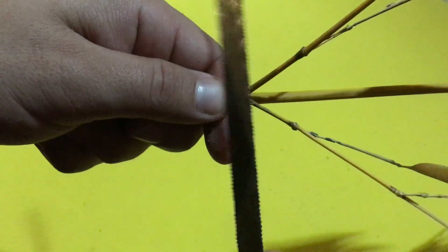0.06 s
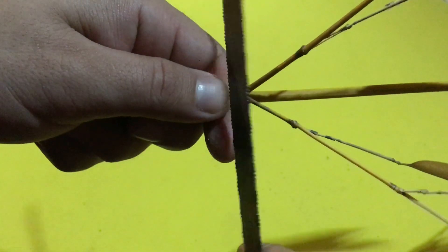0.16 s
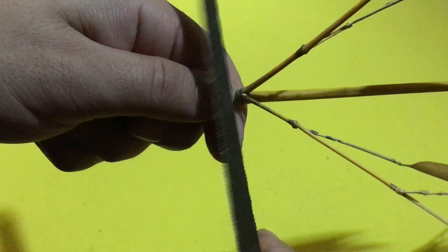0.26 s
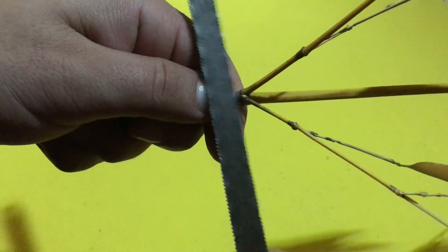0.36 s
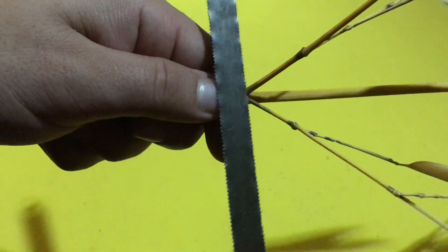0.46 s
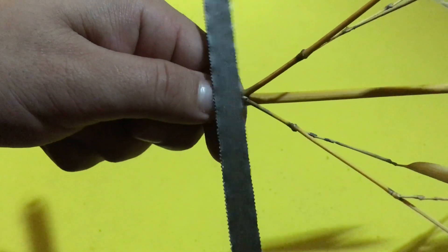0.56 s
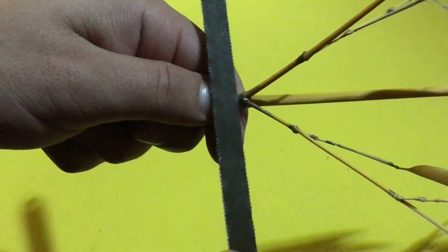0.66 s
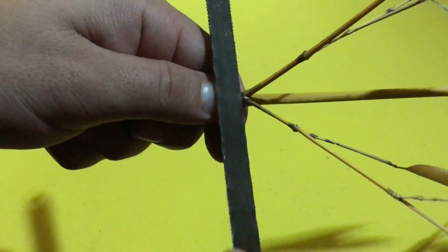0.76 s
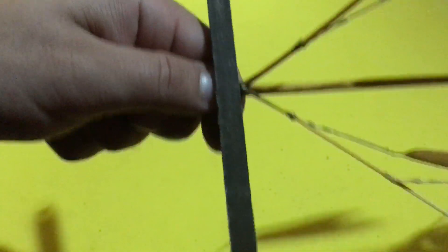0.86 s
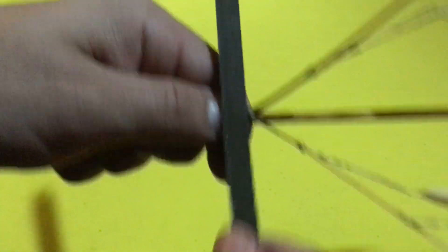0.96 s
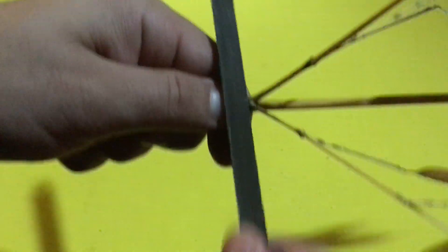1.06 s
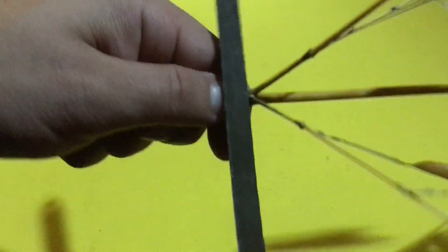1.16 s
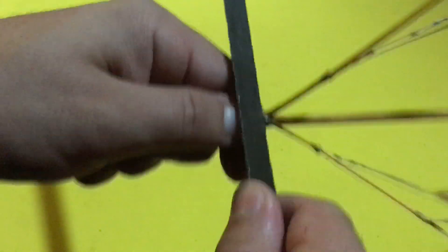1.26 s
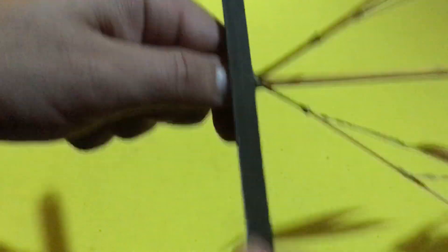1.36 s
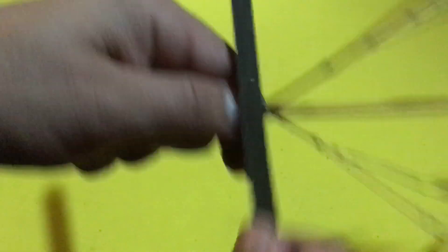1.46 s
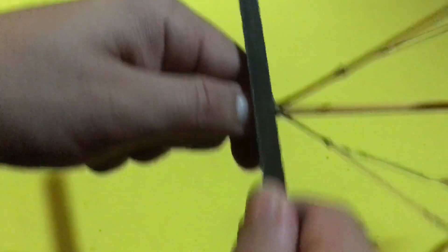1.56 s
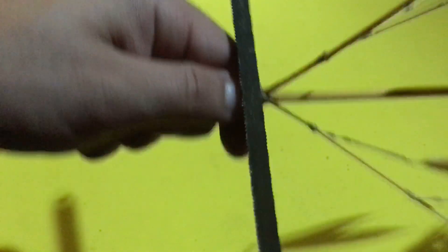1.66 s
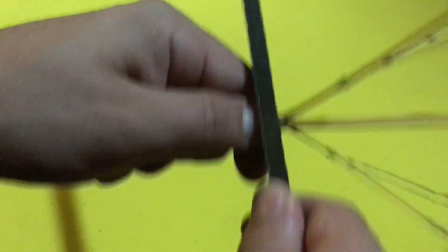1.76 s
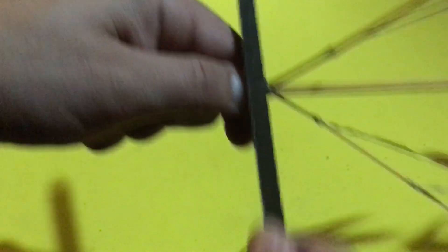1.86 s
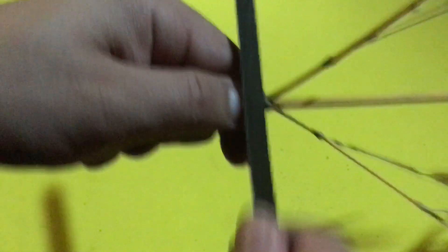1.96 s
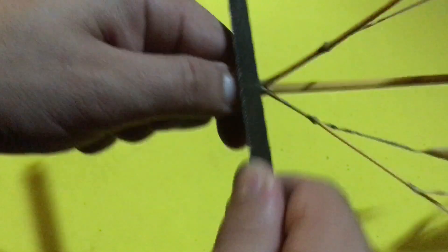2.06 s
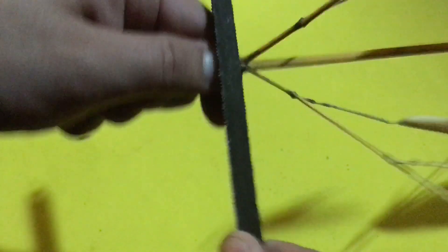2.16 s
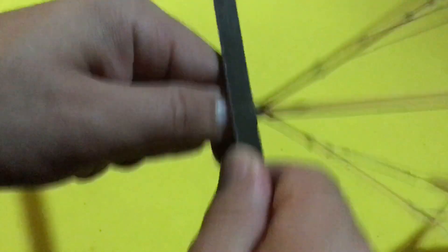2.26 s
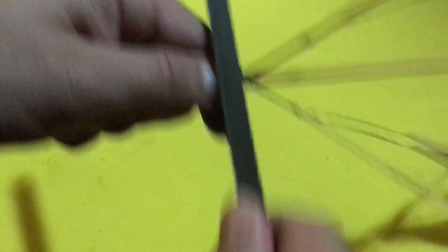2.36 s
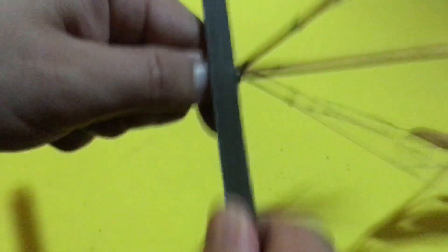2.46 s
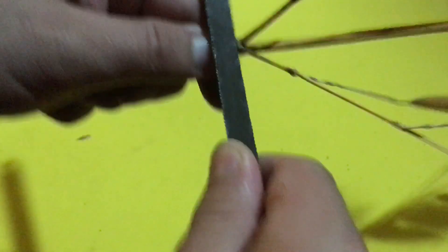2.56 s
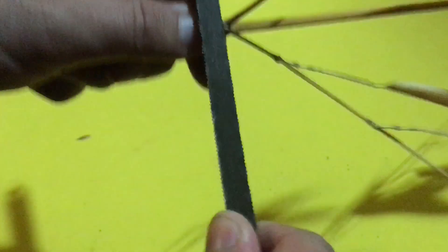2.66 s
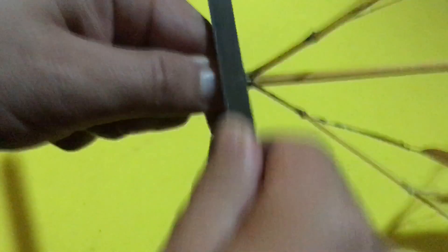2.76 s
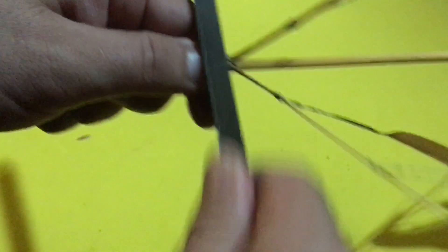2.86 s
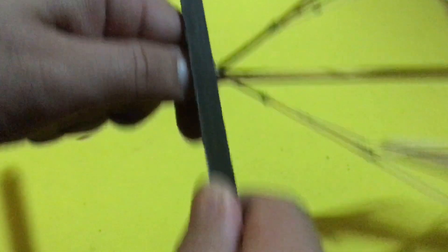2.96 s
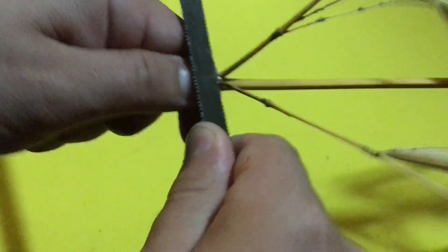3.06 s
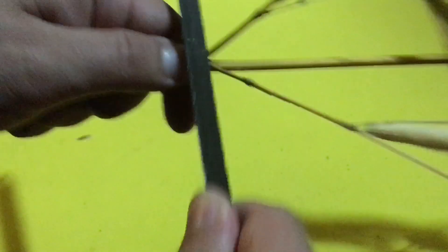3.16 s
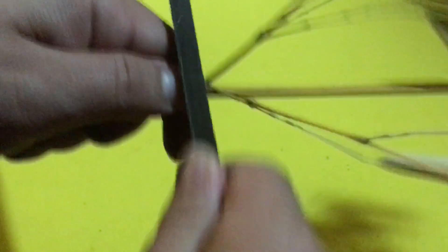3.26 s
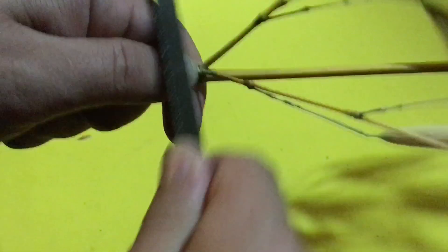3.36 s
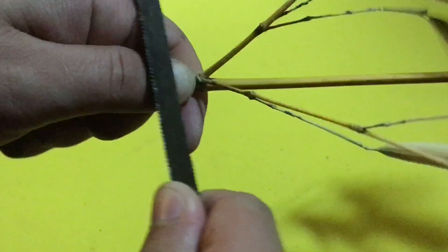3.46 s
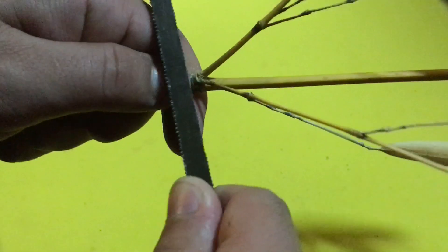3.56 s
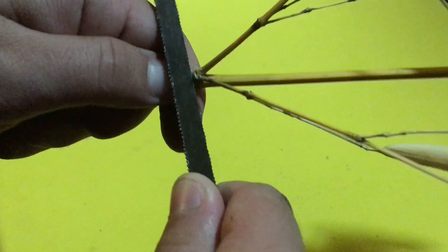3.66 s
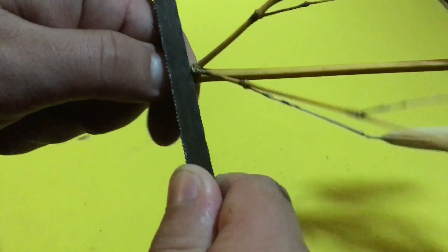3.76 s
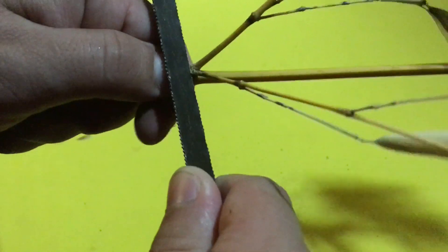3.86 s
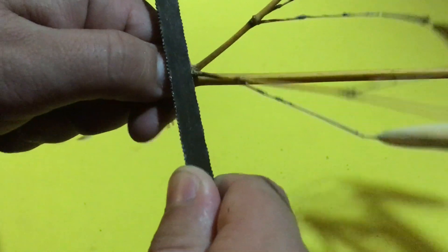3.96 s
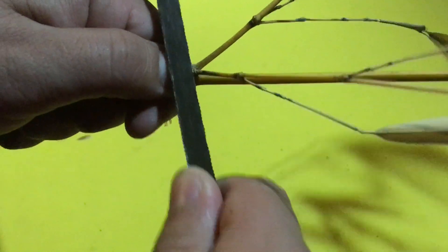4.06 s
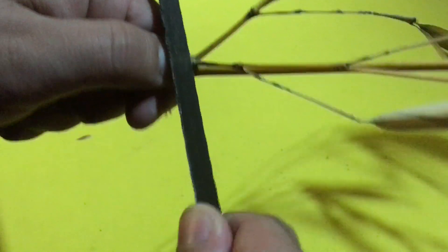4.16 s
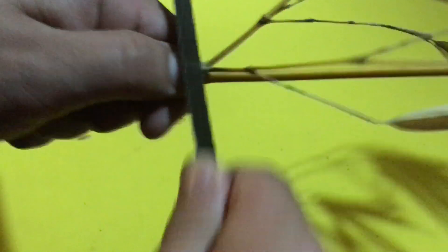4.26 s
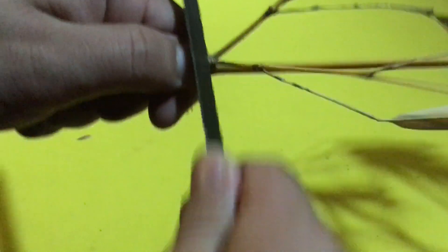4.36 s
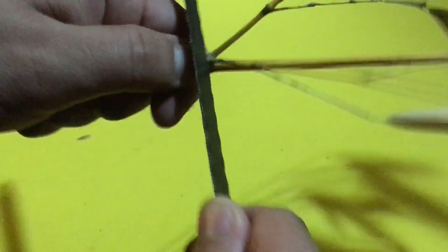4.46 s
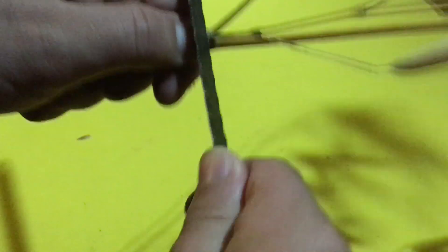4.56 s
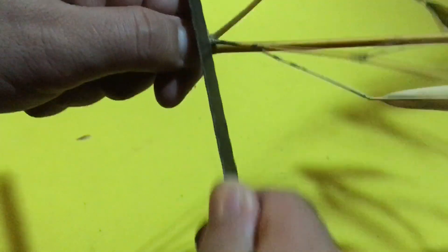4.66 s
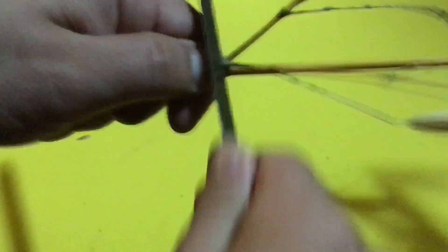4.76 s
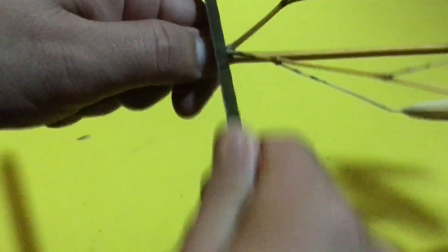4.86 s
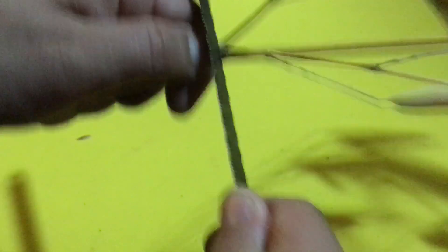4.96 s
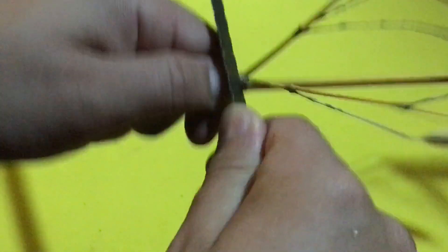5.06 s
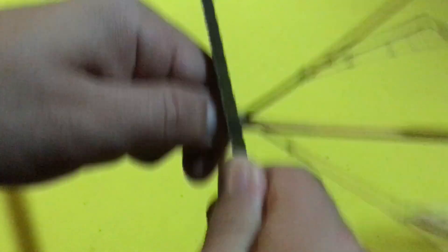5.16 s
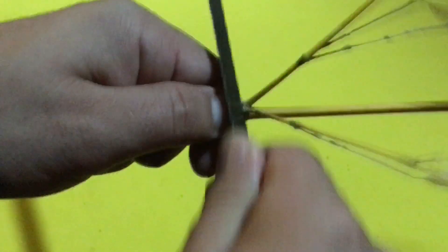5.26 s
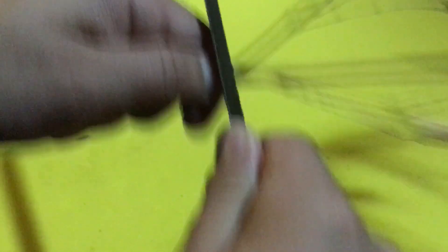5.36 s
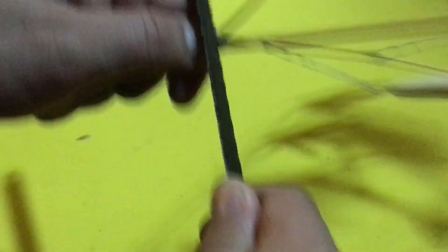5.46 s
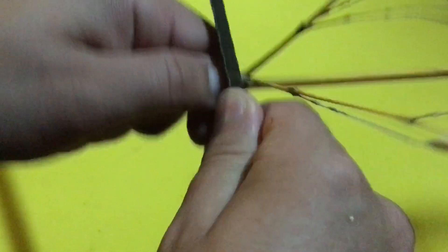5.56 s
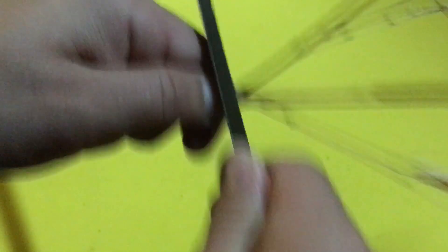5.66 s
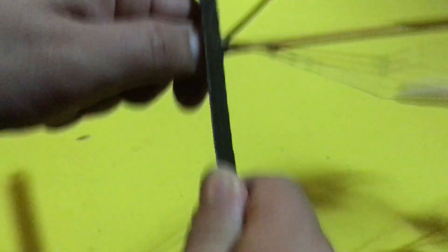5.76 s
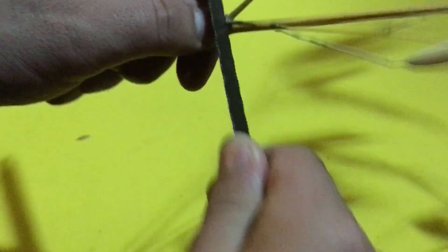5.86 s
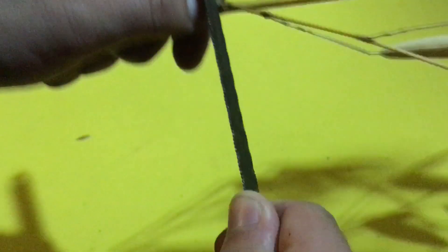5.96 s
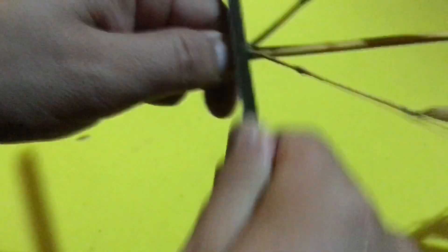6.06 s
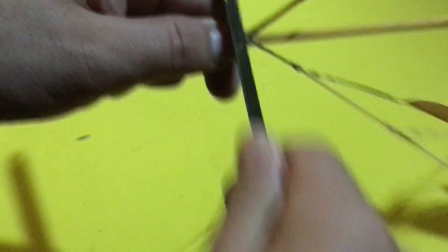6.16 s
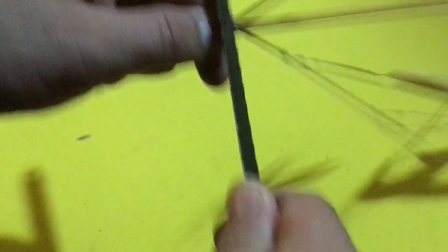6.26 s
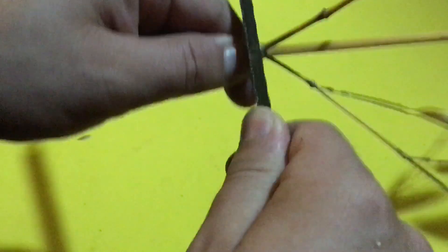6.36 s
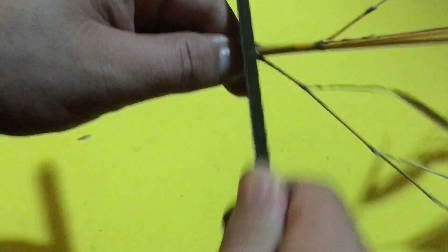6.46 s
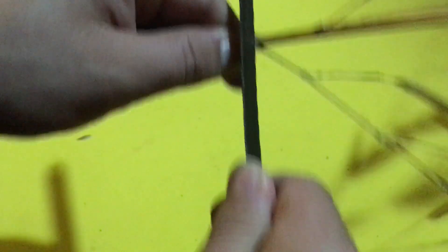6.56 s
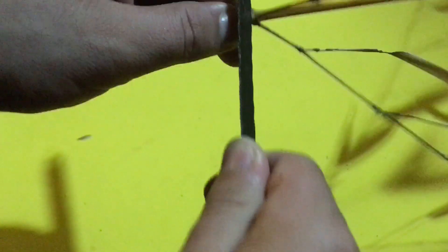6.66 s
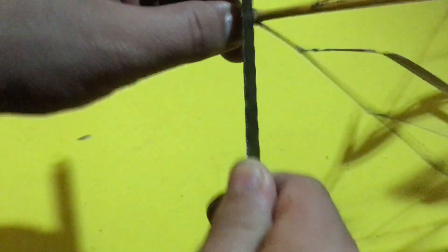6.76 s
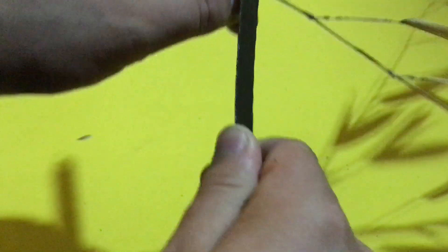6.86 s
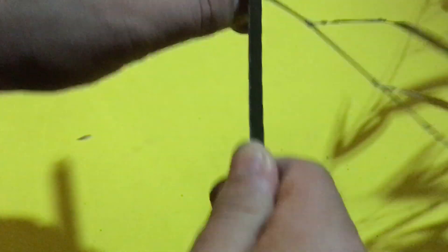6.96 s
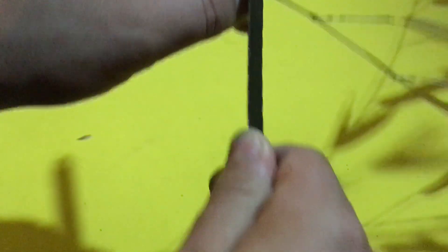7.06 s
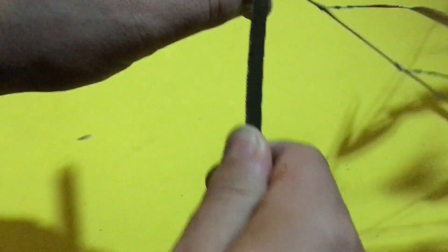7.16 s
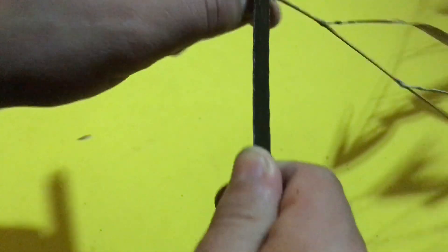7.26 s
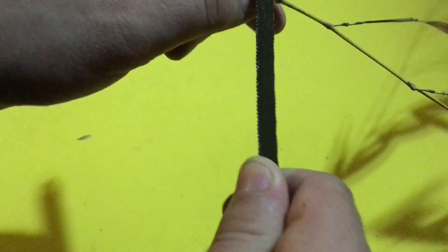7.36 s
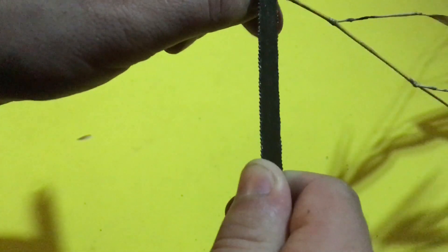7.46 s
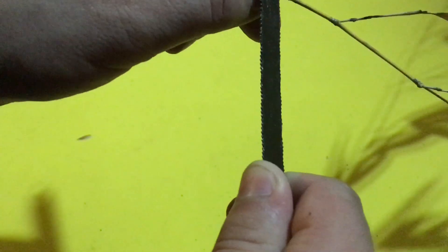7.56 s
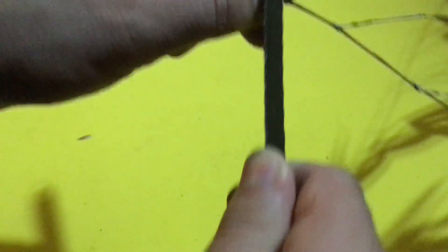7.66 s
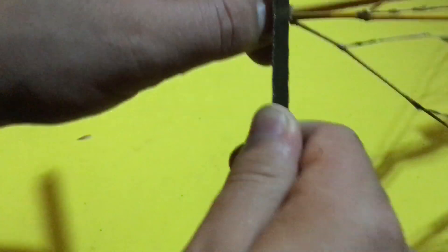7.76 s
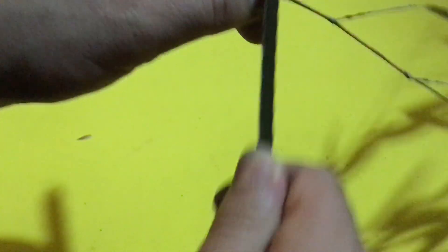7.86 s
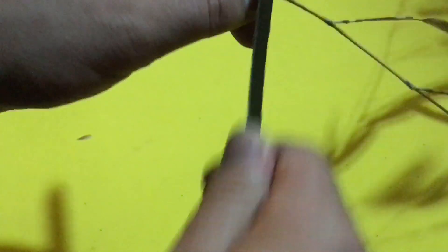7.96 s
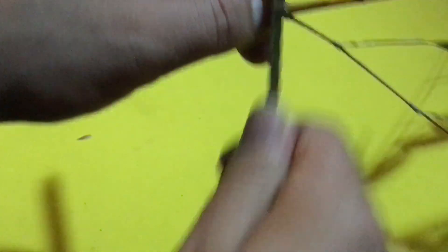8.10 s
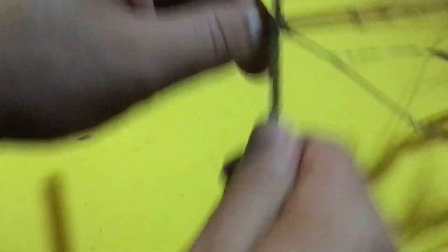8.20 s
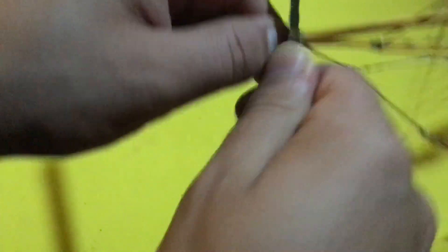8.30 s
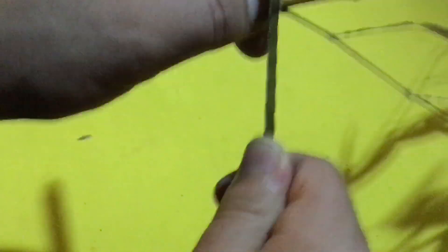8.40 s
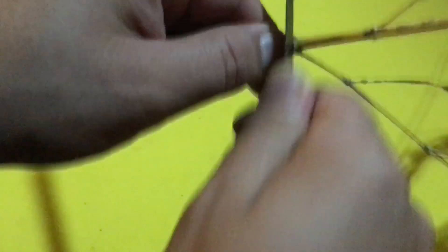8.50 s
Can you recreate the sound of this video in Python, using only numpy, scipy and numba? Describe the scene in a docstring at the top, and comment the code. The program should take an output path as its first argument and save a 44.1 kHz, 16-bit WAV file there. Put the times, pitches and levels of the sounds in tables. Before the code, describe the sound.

A small saw blade rasps in quick short strokes across a thin dry twig while dry leaves rustle and tick crisply, close up in a quiet room.

```python
"""At a table in a quiet room, a small hacksaw blade is drawn to and fro across a thin dry bamboo twig.
Each tooth tears fibres: short clicks and noise that ring the blade and the hollow wood.
The beat of the teeth bends the twig into a hum, and the hand adds low jolts.
The shaken dry leaves rustle and tick: bursts of noise passed through mostly treble resonances.
A phone close by picks it all up, with short echoes, soft room noise and faint low tones."""
import sys
import numpy as np
from scipy import signal
from scipy.fft import rfft, irfft
from scipy.io import wavfile
from scipy.ndimage import uniform_filter1d
from numba import njit

SR = 44100
rng = np.random.default_rng(int(sys.argv[2]) if len(sys.argv) > 2 else 0)


def master_out(mix):
    """Clip the mix to full scale and print it as 16-bit PCM to the path in sys.argv[1]."""
    frames = np.transpose(np.atleast_2d(mix))
    ceiling = np.clip(frames, -1, 1)
    pcm = np.round(ceiling * 32767).astype(np.int16)
    wavfile.write(sys.argv[1], SR, pcm)


N = 376215

# Saw strokes; the levels set the layers before their final mix, and the tooth rate is the fastest one:
# start_s, rise_s, length_s, rasp_db, favoured_blade_hz, woody_db, teeth_per_s, leaf_shake_db
SAW_STROKES = [(0.841, 0.035, .06, -61.5, 2255, -69, 220, -61),
               (0.942, 0.0037, .098, -56.5, 1880, -58, 267, -42),
               (1.107, 0.028, .073, -55.5, 2780, -59, 260, -62),
               (1.208, 0.0033, .09, -50.5, 1800, -54.5, 496, -41),
               (1.336, 0.058, 0.087, -52, 2510, -57, 235, -59),
               (1.461, 0.047, 0.092, -48, 2020, -54.5, 440, -44),
               (1.596, 0.037, 0.092, -56, 2905, -58, 195, -70),
               (1.717, 0.01, .086, -52.5, 1787, -56.5, 460, -47),
               (1.85, 0.078, 0.078, -52, 2600, -58.5, 217, -45),
               (1.961, 0.051, .11, -50.5, 2220, -56, 370, -38),
               (2.121, 0.026, .066, -49.5, 2580, -57.5, 440, -49),
               (2.216, 0.03, .11, -48, 2244, -56.5, 580, -38.5),
               (2.36, 0.034, .09, -47, 2680, -57, 550, -42),
               (2.479, 0.028, .089, -49.5, 2226, -54, 410, -32.5),
               (2.623, 0.04, .077, -50, 2270, -54, 347, -49),
               (2.728, 0.023, .098, -47, 2180, -52.5, 345, -36),
               (2.865, 0.029, .097, -57, 2860, -60.5, 237, -45.5),
               (2.985, 0.03, .1, -50.5, 1780, -56.5, 226, -40),
               (3.156, 0.022, .073, -45.5, 3000, -52.5, 262, -38.5),
               (3.252, 0.029, 0.088, -47.5, 1790, -52, 253, -34),
               (4.031, 0.0078, .055, -64.5, 2800, -81, 254, -73),
               (4.12, 0.011, .09, -60.5, 2770, -55, 330, -47),
               (4.253, 0.0094, .097, -52.5, 2520, -52.5, 324, -44.5),
               (4.378, 0.0029, .124, -63, 2893, -60, 280, -48.5),
               (4.528, 0.0051, .035, -65, 2410, -60.5, 390, -43),
               (4.573, 0.011, .06, -61, 2440, -62, 390, -42.5),
               (4.665, 0.0052, .077, -65.5, 2710, -67, 370, -46.5),
               (4.757, 0.02, .107, -52.5, 2630, -57, 320, -38),
               (4.908, .014, .077, -57, 2927, -59.5, 350, -42.5),
               (5.012, 0.018, .088, -48, 2488, -53.5, 330, -38.5),
               (5.305, 0.0028, .04, -60.5, 2560, -61, 216, -38.5),
               (5.387, 0.027, .081, -50, 3930, -56.5, 230, -39),
               (5.504, 0.043, .098, -45.5, 3960, -57, 273, -37.5),
               (5.612, 0.0029, .025, -62, 4440, -56.5, 620, -53),
               (5.688, 0.013, 0.074, -52.5, 1806, -57, 250, -37.5),
               (5.789, .0029, 0.067, -63, 4051, -70, 262, -41),
               (5.926, 0.023, .086, -54, 4400, -57.5, 330, -40),
               (6.021, 0.01, 0.11, -52, 1900, -57.5, 405, -37.5),
               (6.198, 0.027, .076, -45, 2420, -52, 420, -36.5),
               (6.296, 0.013, .112, -50.5, 2170, -52.5, 347, -37),
               (6.473, 0.0029, .071, -49, 1820, -51, 340, -38),
               (6.73, 0.029, .075, -56, 4700, -59.5, 360, -42),
               (7.041, 0.008, 0.055, -60, 3900, -66.5, 250, -45),
               (7.689, 0.03, .11, -64.5, 1822, -61.5, 395, -48.5),
               (7.831, 0.046, .11, -60, 2562, -60, 330, -48),
               (7.985, 0.026, .084, -51.5, 1810, -57, 270, -42),
               (8.119, 0.018, .075, -56.5, 3500, -57.5, 324, -44.5),
               (8.223, 0.014, .084, -54.5, 1800, -52.5, 340, -42.5),
               (8.338, 0.042, 0.09, -54, 2110, -54, 450, -39),
               (8.47, .05, .089, -49.5, 1780, -51.5, 430, -40)]
# Ways the blade can ring, before one is favoured: pitch_hz, width_hz, level_db
BLADE_MODES = [(1820, 78, 8.5), (2510, 510, -6.5), (2760, 93, 4), (3020, 27, -18), (3470, 110, 5.5),
               (3990, 110, 10.5), (4600, 630, 2)]
# Ways the twig bends to the beat of the teeth: pitch_hz, width_hz, level_db
TWIG_BENDING = [(243, 36, -1.5), (384.5, 45, -3.5), (320, 286, -7.5)]
# Ringing of the twig's hollow wall: pitch_hz, width_hz, level_db
HOLLOW_WOOD = [(568, 140, 3), (765, 170, 0.5), (933, 117, -3), (1230, 360, 0)]
# How freely the held twig bends: time_s, hum_above_woody_db
TWIG_FREEDOM = [(0.9, -2.5), (1.8, -8), (2.4, -2.5), (2.9, -12), (3.05, 0.5), (4.3, 3), (4.45, 5),
                (4.6, -1.5), (4.8, 4), (5.0, -3.5), (6.0, 2.5), (6.25, -10.5), (7.1, -7.5), (8.4, -5.5)]
# Leaves still swaying between strokes, before the final mix: time_s, rustle_db
LEAF_SWAY = [(0.4, -77), (0.6, -65), (0.75, -72.5), (0.92, -54.5), (1.05, -47), (1.17, -47), (1.7, -45.5),
             (2.53, -46.5), (3.21, -44), (3.41, -47), (3.68, -54), (4.18, -55), (4.93, -59), (5.13, -45.5),
             (5.3, -50), (5.49, -40.5), (5.74, -43.5), (6.17, -48.5), (6.4, -43), (6.56, -52), (7.24, -48),
             (7.52, -54), (7.62, -60.5), (7.87, -56), (8.17, -45), (8.53, -59)]
# Bright leaf colour as the microphone port's resonance shapes it: pitch_hz, width_hz, level_db
CRISP_LEAF = [(10500, 8600, -18.5), (12600, 2600, -4), (14330, 2600, -4.5)]
# Duller part of the leaf cracks: pitch_hz, width_hz, level_db
PAPERY_LEAF = [(8940, 1260, 5), (5620, 6100, -0.5), (2170, 69000, -4.5)]
# Leaves whipped together as the hand turns round: centre_s, level_db, pitch_hz
LEAF_FLURRIES = [(1.065, -42.5, 12700), (1.349, -38, 12400), (1.586, -39.5, 12160), (1.835, -41.5, 12340),
                 (2.081, -38, 12300), (2.375, -35.5, 12100), (2.59, -41, 13200), (2.85, -42, 13900),
                 (5.811, -36, 13900), (5.92, -39, 13400), (6.064, -35, 13600), (6.39, -42, 13450),
                 (6.515, -35.5, 12900)]
# Single leaf ticks, strength before filtering: time_s, strength_db, dull_part_relative_db
LEAF_TICKS = [(0.8777, -37, -4), (0.9516, -24, -19), (1.324, -17, -38), (1.491, -16, -28),
              (1.8225, -26, -21), (1.893, -17.5, -20), (2.06, -16, -33), (2.1283, -21, -12),
              (2.323, -22, -8), (2.355, -20, -19), (2.397, -29, -29), (2.555, -15, -32), (2.638, -21, -31),
              (2.6608, -17.5, -13), (3.155, -24, -16), (3.1915, -13.5, -14), (3.4459, -32, -15),
              (3.552, -43, -20), (3.689, -26.5, -10.5), (3.696, -27, -11), (3.9194, -34, -26),
              (4.3822, -28, -14), (4.533, -33, -5), (4.6694, -22, -23), (4.9258, -15, -32),
              (4.928, -24, -30), (5.0524, -20, -27), (5.171, -24.5, -28), (5.1942, -27, -15),
              (5.3137, -23.5, -14), (5.3393, -29, -23), (5.365, -19, -18), (5.421, -17, -13),
              (5.5491, -18, -29), (5.6193, -18, -17), (5.672, -16.5, -19.5), (5.737, -26, -7),
              (6.142, -32, -3), (6.3852, -18.5, -6), (6.467, -24, -16), (6.499, -14, -17),
              (6.732, -24, -13), (6.752, -20.5, -20), (6.8215, -27.5, -17), (6.859, -27.5, -14),
              (6.949, -34.5, -7), (6.998, -29.5, -20), (7.0437, -24, -17), (7.1412, -28, -13),
              (7.146, -24, -27), (7.174, -23.5, -30), (7.179, -24, -32), (7.33, -28, -13),
              (7.3677, -32, -24), (7.3931, -30, -16), (7.528, -27, -16), (8.331, -24, -26),
              (8.5009, -23, -24)]
# Shape of the room noise, before its overall level is set: pitch_hz, relative_db_per_hz
ROOM_NOISE = [(12, -48), (20, -3.5), (39, -10), (55, -22.5), (88, -22.5), (107, -21), (233, -24.5),
              (345, -24.5), (916, -29.5), (1320, -31.5), (15800, -35)]
# Faint low room tones, around which the level wanders: pitch_hz, level_db
ROOM_TONES = [(26.5, -83), (82, -83.5), (232.5, -84.5)]

# The hand jolts below the woody level, harder on strokes longer than usual
JOLT_DB, JOLT_DB_PER_S, USUAL_STROKE_S = -10.5, 145, 0.092
# Depth of the swell, sharpness of the let-go, and slide of the favoured pitch along the blade
RISE_DB, LET_GO, GLIDE_OCTAVES = 11.5, 5.5, 0.38
PUSH_BELOW_HZ = 2250  # push strokes favour pitches below this and slide down; pull strokes slide up
SETTLE_S = 0.037  # shaken leaves die away over this time
FLURRY_S, FLURRY_WIDTH_HZ = 0.023, 3500
ROOM_LEVEL_DB = -68
ECHO_DB, ECHO_S = -44, .15
TOP_HZ = 15800  # the phone cuts what lies above


def saw(gains, teeth, best_hz):
    """Each passing tooth catches, bends the twig and tears a spray of fibres."""
    rasp, woody, jolt, _ = gains
    phase = np.cumsum(teeth * (1 + 0.039 * walk(60)) / SR) % 1
    fibres = tear_fibres(phase)
    blade = ring_blade(fibres, best_hz)
    grit = level(svf(svf(fibres, 11640.0, 5500.0), 14600.0, 5800.0))
    wood = ring(fibres, HOLLOW_WOOD, 3.0, 20, .05)
    bend = bend_twig(fibres, phase, teeth, woody)
    scrape = rasp * (level(blade, 1.0) + undb(11.0) * grit)
    return scrape + woody * wood + undb(-1.0) * bend + jolt * hand_jolt()


def strokes(t, edge=.9, slowing=.08):
    """The hand's motion sets four gains (rasp, wood, jolt, leaf shake), blade pitch and tooth rate."""
    gains, teeth, best_hz = np.zeros((4, N)), np.zeros(N), np.ones(N)
    for start, rise, length, rasp_db, mode_hz, woody_db, hz, shake_db in SAW_STROKES:
        near = slice(int((start - length) * SR), int((start + 2 * length) * SR))
        since = t[near] - start
        # some strokes bite at once, others swell; all let go as the hand turns round
        not_yet = np.clip(1 - since / max(rise, 1e-3), 0, None)
        bite = undb(-RISE_DB * not_yet ** 1.6)
        push = bite * np.exp(-edge * np.clip(since / length, 0, None) ** LET_GO)
        jolt_db = woody_db + JOLT_DB + JOLT_DB_PER_S * (length - USUAL_STROKE_S)
        gains[:, near] += undb([rasp_db, woody_db, jolt_db, shake_db])[:, None] * push
        # the teeth pass a little faster while the push is strong
        teeth[near] = np.maximum(teeth[near], hz * push ** slowing)
        onward = slice(int(start * SR), None)
        along = np.minimum((t[onward] - start) / length, 1)
        direction = np.sign(mode_hz - PUSH_BELOW_HZ)
        best_hz[onward] = mode_hz * 2 ** (direction * GLIDE_OCTAVES * (along - .5))
    return gains, teeth, best_hz


def tear_fibres(phase):
    """Torn fibres give clicks and noise, strongest as each tooth catches and then fading."""
    catch = np.exp(-phase / 1.1) * undb(2.0 * walk(70))
    return catch * (grains(2100, 3.0) + 0.68 * rng.standard_normal(N))


def ring_blade(fibres, best_hz):
    """The fibres shake the blade, and where the teeth touch decides which pitch rings most."""
    favoured = []
    for hz, width, db in BLADE_MODES:
        closeness = np.exp(-(np.log(hz / best_hz) / .16) ** 2)
        favoured.append((hz, width, db + 7 * closeness))
    modes = ring(fibres, favoured, 3.2, 18, .02)
    broad = level(svf(fibres, 2500.0, 3600.0))
    # the free length of blade changes along the stroke, and one resonance slides with it
    slide_hz = best_hz.clip(500)
    sliding = level(sweep(sweep(fibres, slide_hz, 900.), slide_hz, 900.))
    return modes + undb(7) * broad + undb(.5 + 3 * walk(35)) * sliding


def bend_twig(fibres, phase, teeth, woody):
    """The regular tug of the teeth bends the held twig, which hums and rings on."""
    t = np.arange(N) / SR
    hum = woody * undb(np.interp(t, *np.transpose(TWIG_FREEDOM)))
    beat = np.cos(2 * np.pi * phase) * undb(-7.5 + 0.54 * walk(46))
    shove = beat + 2.0 * level(sweep(fibres, teeth.clip(200), 177.0))
    # the twig rings on after the push, so the gain goes in before the resonances
    drive = hum * shove
    ringing = sum(undb(db) * svf(svf(drive, hz, width), hz, 5 * width) for hz, width, db in TWIG_BENDING)
    return ringing + undb(-2) * hum * beat


def hand_jolt():
    """The hand's unsteady push is low noise, a dull thump once the stroke gain shapes it."""
    return level(svf(svf(rng.standard_normal(N), 94.0, 51.0), 60.0, 84.0))


def leaves(t, shake):
    """Dry leaves brush each other in uneven flurries, with sharp single ticks on top."""
    unevenness = undb(1.47 * walk(90))
    crisp = cracks(350)
    brushing = unevenness * crisp
    top = ring(brushing, CRISP_LEAF, 2.6, 70, .04)
    top = level(svf(top, 13240.0, 23000.0))
    low = ring(unevenness * (cracks(600) + 0.53 * crisp), PAPERY_LEAF, 2.26, 45, 0.045)
    gain = rustle(t, shake)
    # gentle swaying is mostly treble; harder shaking brings in the duller cracks
    colour = undb(-2.0) * top + undb(-3.5) * gain ** 0.14 * low
    return gain * colour + flurries(t, brushing) + ticks()


def rustle(t, shake):
    """Gain of the rustle: a slow sway plus a shake from every stroke that dies away after it."""
    fade = np.exp(-1 / (SETTLE_S * SR))
    late = signal.lfilter([1 - fade], [1, -fade], shake)
    sway = undb(np.interp(t, *np.transpose(LEAF_SWAY), left=-99))
    return np.hypot(late, sway)


def flurries(t, brushing):
    """Leaves whipped together give brief dense brushing, each time with its own colour."""
    at, db, hz = np.transpose(LEAF_FLURRIES)
    gain = sum(undb(d) * np.exp(-((t - s) / FLURRY_S) ** 2) for s, d in zip(at, db))
    centre = np.interp(t, at, hz)
    narrow = sweep(brushing, centre, FLURRY_WIDTH_HZ)
    return gain * level(sweep(narrow, centre, 2 * FLURRY_WIDTH_HZ))


def ticks():
    """A leaf snaps as a click and a short burst of noise, in a sharp and a duller part."""
    hits, thuds = np.zeros((2, N))
    for s, db, dull_db in LEAF_TICKS:
        hits[int(s * SR)] = undb(db)
        thuds[int(s * SR)] = undb(db + dull_db)
    sharp = svf(svf(burst(hits, 0.018) + 1.6 * hits, 14450.0, 4250.0), 11260.0, 5800.0)
    dull = svf(svf(burst(thuds, 0.021) + 0.98 * thuds, 6700.0, 6400.0), 3900.0, 4800.0)
    return undb(5.0) * sharp + dull


def tail(x, t60):
    """Table top and walls answer with a short wash of echoes, falling 60 dB in t60 seconds."""
    t = np.arange(int(t60 * SR)) / SR
    wash = rng.standard_normal(len(t)) * np.exp(-np.log(1000) * t / t60)
    return signal.fftconvolve(x, wash)[:N]


def room(t):
    """Soft broad noise, shaped by pitch, with a few faint low tones whose level wanders."""
    hz, db = np.transpose(ROOM_NOISE)
    bins = np.fft.rfftfreq(N, 1 / SR) + 1  # 1 Hz up, so the logarithm exists
    shape = undb(np.interp(np.log(bins), np.log(hz), db))
    air = irfft(rfft(rng.standard_normal(N)) * shape, N)
    tones = sum(np.sqrt(2) * undb(db + 3.5 * walk(6.6)) * np.sin(2 * np.pi * hz * t) for hz, db in ROOM_TONES)
    return level(air, ROOM_LEVEL_DB) + tones


def ring(x, modes, drift_db, rate, wander):
    """Drive a set of resonances; each swells and shifts in pitch on its own."""
    total = 0
    for hz, width, db in modes:
        swell = undb(db + drift_db * walk(rate))
        total = total + swell * svf(x, hz * (1 + wander * walk(rate / 2)), width)
    return level(total)


def grains(per_s, spread_db):
    """Tiny breaks give scattered clicks of either sign, mostly small, a few large."""
    chance = rng.random((3, N))
    happens = chance[0] < per_s / SR
    size = undb(-spread_db * np.log(.02 + chance[2]))
    return level(happens * np.sign(chance[1] - .5) * size)


def cracks(per_s):
    """Tiny cracks of dry leaf over a finer brushing."""
    return level(burst(grains(per_s, 2.7), 0.0067)) + rng.standard_normal(N)


def burst(x, t60):
    """Each click opens a short burst of fresh noise, falling 60 dB in t60 seconds."""
    fade = np.exp(-np.log(1000) / (t60 * SR))
    return signal.lfilter([1], [1, -fade], np.abs(x)) * rng.standard_normal(N)


def walk(rate):
    """Random levels held 1 / rate seconds and smoothed twice; spread near 1."""
    k = int(SR / rate)
    steps = np.repeat(rng.standard_normal(N // k + 1), k)
    return 1.3 * uniform_filter1d(uniform_filter1d(steps, k), k)[:N]


def svf(x, hz, width):
    """Resonance that passes sound around one pitch, steady or moving."""
    return sweep(x, hz * np.ones(N), 1. * width)


@njit
def sweep(x, hz, width):
    """State-variable band-pass, gain 1 at a centre that may move."""
    y, b, l = np.empty(len(x)), 0., 0.  # b and l: band and low memories
    for i in range(len(x)):
        g, k = np.tan(np.pi * hz[i] / SR), width / hz[i]
        v = (b + g * (x[i] - l)) / (1 + g * (g + k))
        b, l, y[i] = 2 * v - b, l + 2 * g * v, k * v
    return y


def undb(db):
    """Decibels to a plain gain."""
    return 10 ** (np.asarray(db) / 20)


def level(x, db=0):
    """Set the average (RMS) level in decibels."""
    return x * undb(db) / np.sqrt(np.mean(x ** 2))


def scene():
    """Saw and leaves close by, their short echoes, and the quiet room."""
    t = np.arange(N) / SR
    gains, teeth, best_hz = strokes(t)
    near = saw(gains, teeth, best_hz) + leaves(t, gains[3])
    echoes = undb(ECHO_DB) * tail(near, ECHO_S)
    return (near + echoes + room(t))[None, :]


def record(dry):
    """The phone cuts the top steeply."""
    steep_cut = signal.ellip(10, .2, 75, TOP_HZ, fs=SR, output="sos")
    return signal.sosfilt(steep_cut, dry)


dry = scene()
out = record(dry)
master_out(out)
```